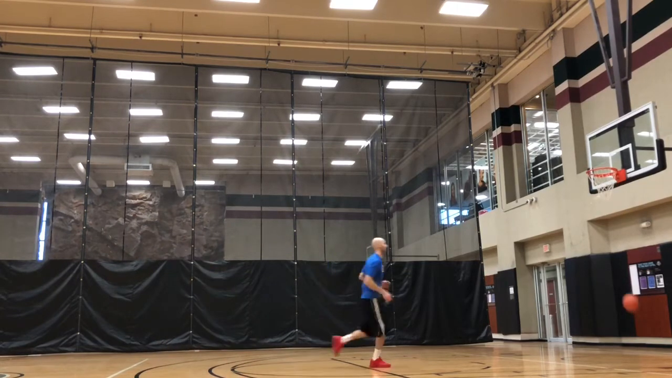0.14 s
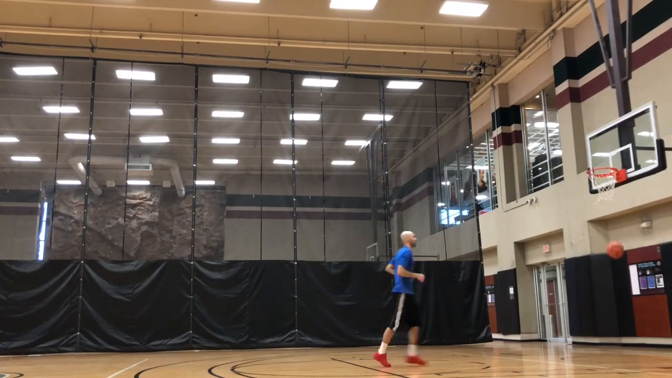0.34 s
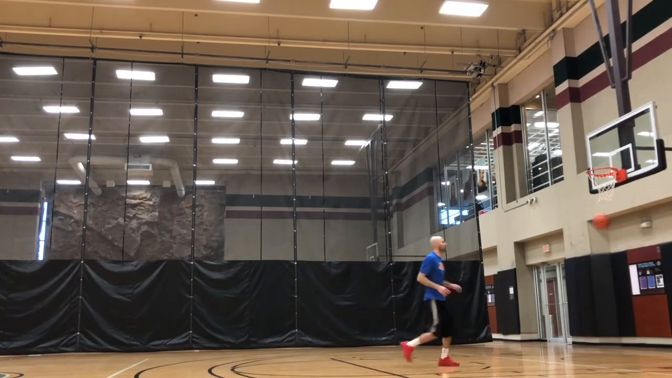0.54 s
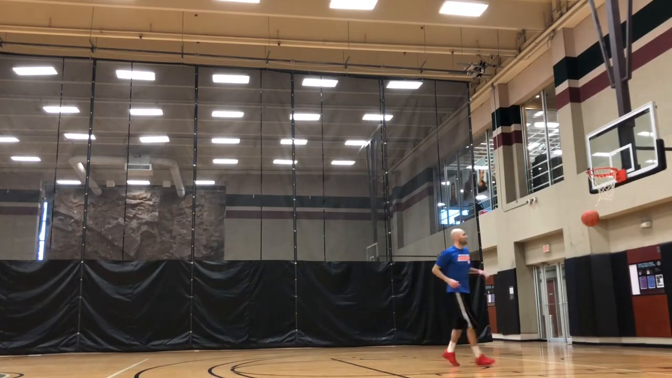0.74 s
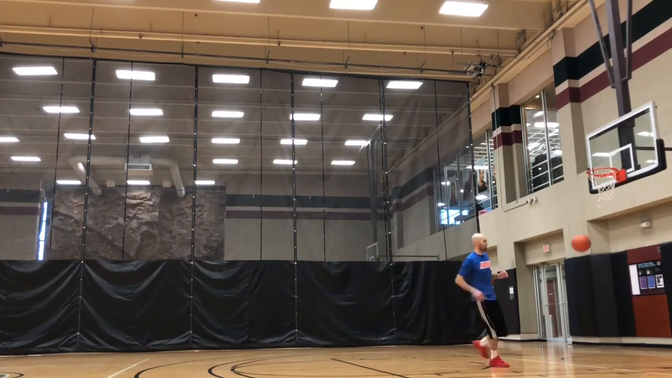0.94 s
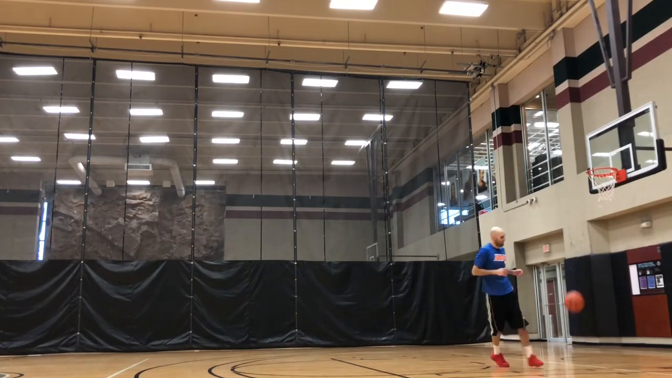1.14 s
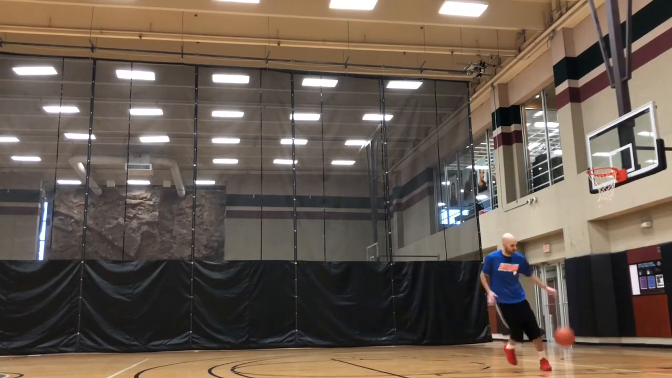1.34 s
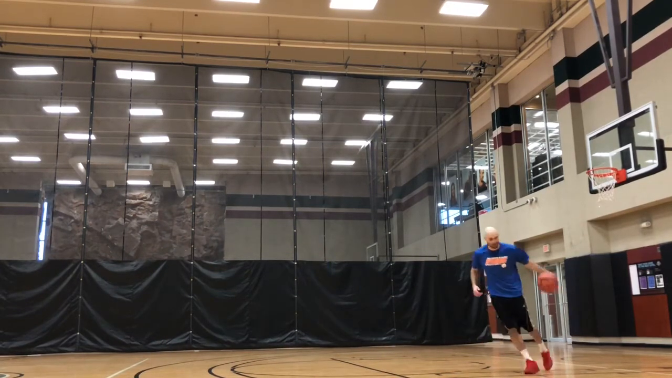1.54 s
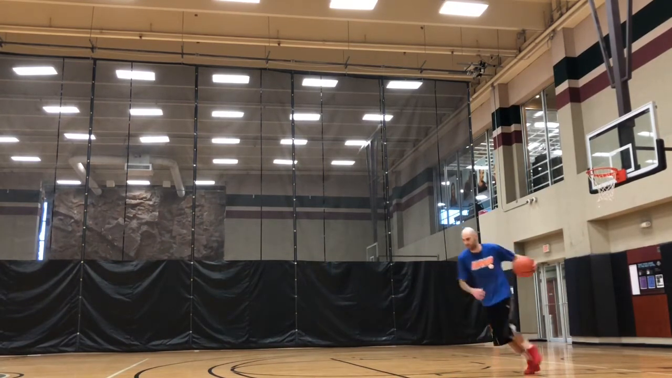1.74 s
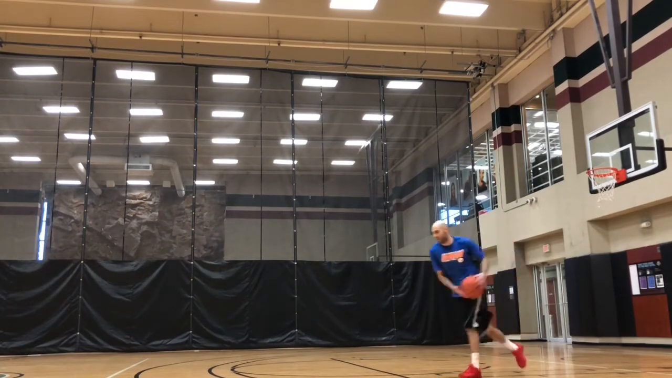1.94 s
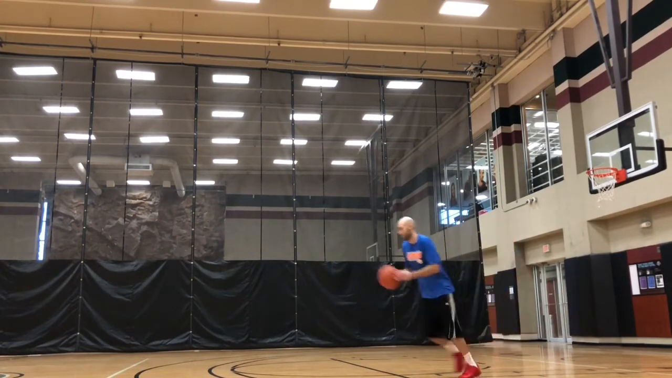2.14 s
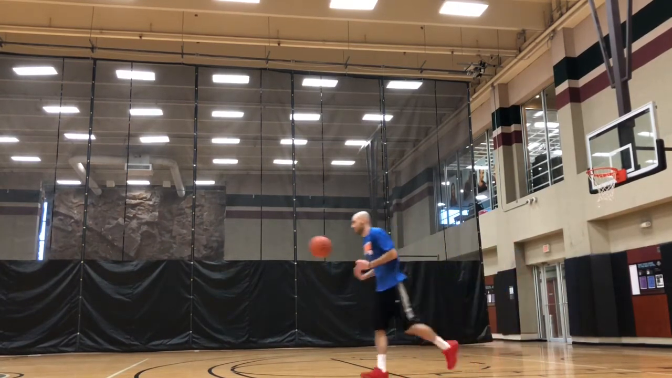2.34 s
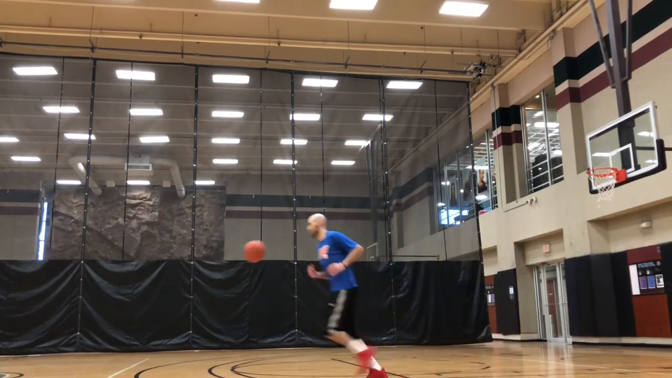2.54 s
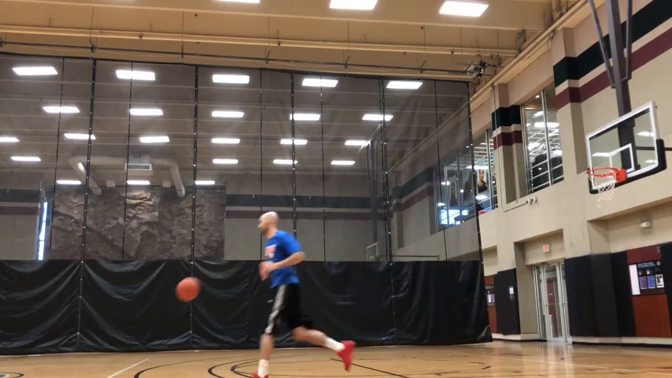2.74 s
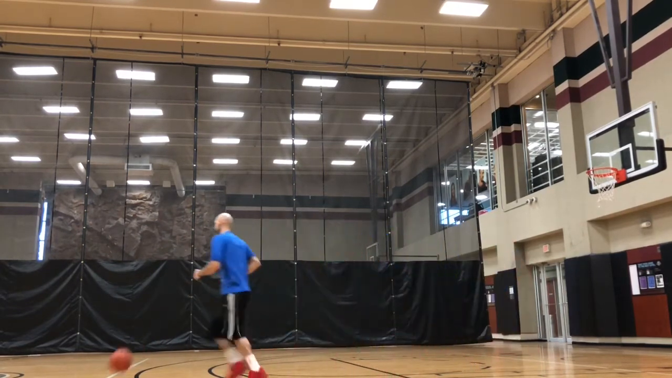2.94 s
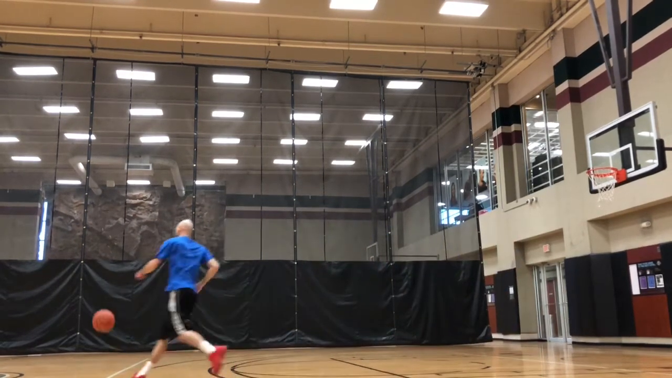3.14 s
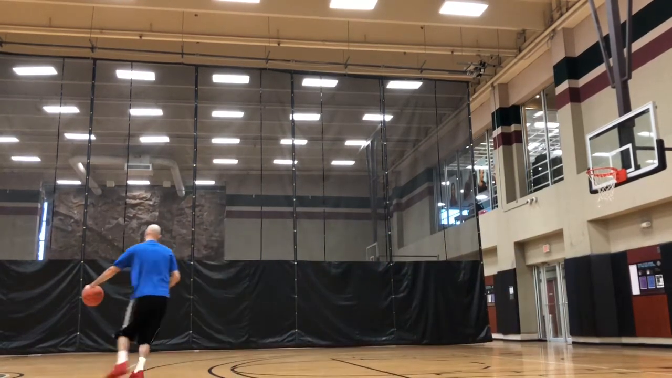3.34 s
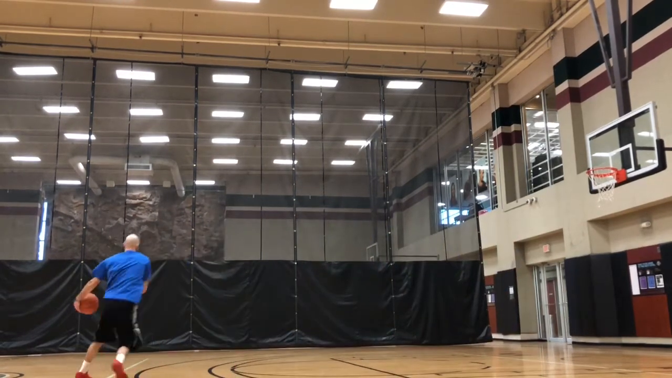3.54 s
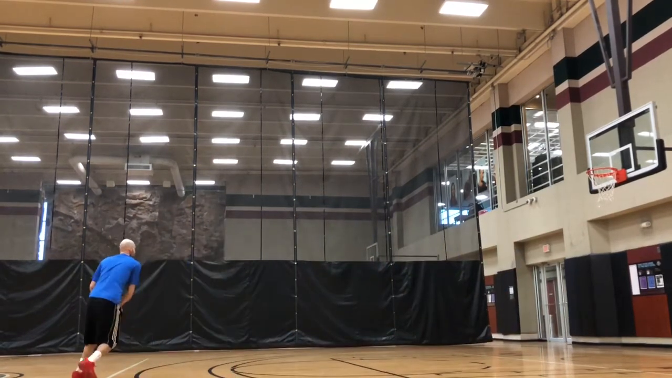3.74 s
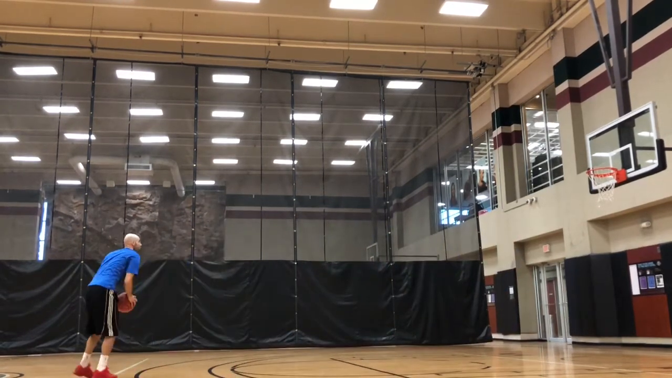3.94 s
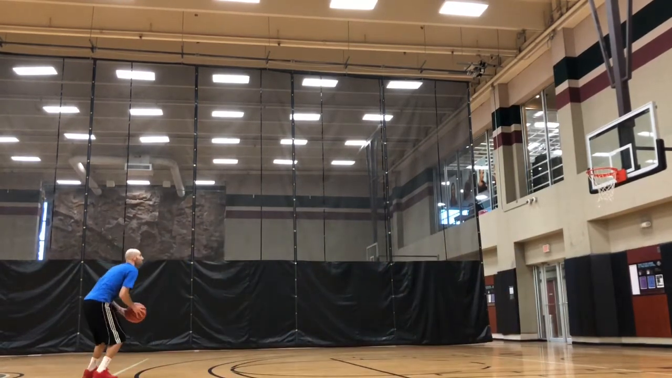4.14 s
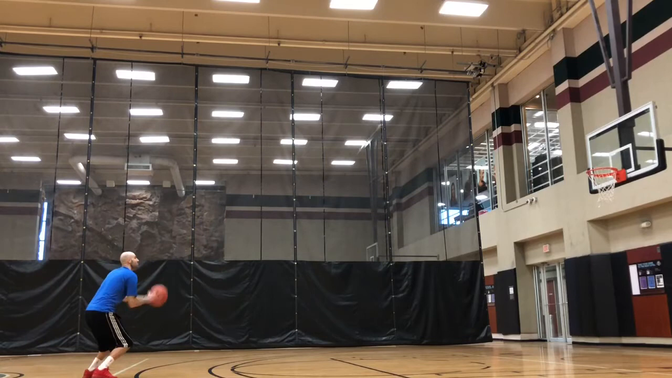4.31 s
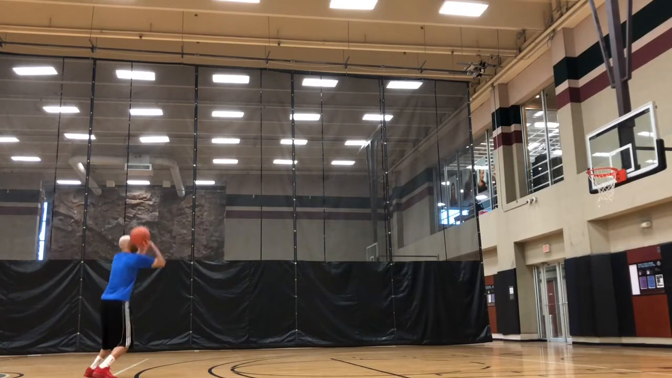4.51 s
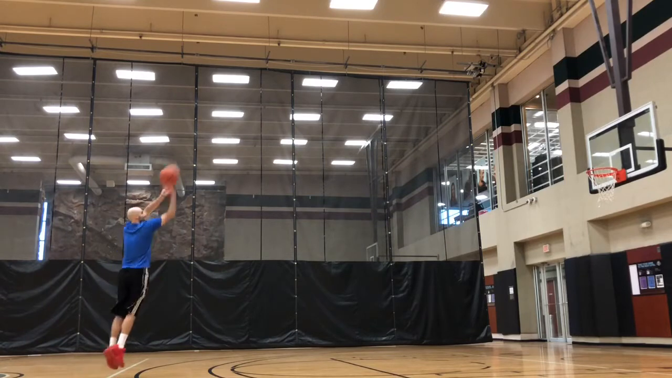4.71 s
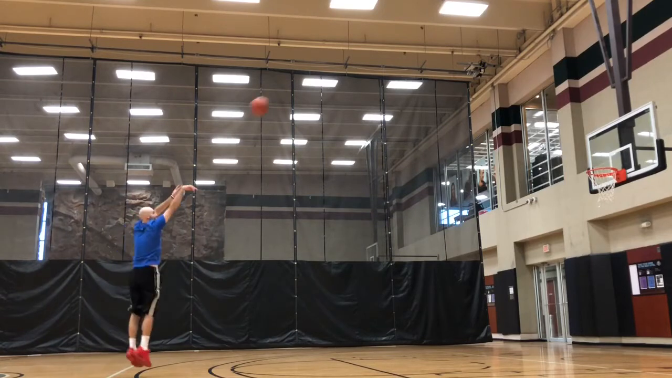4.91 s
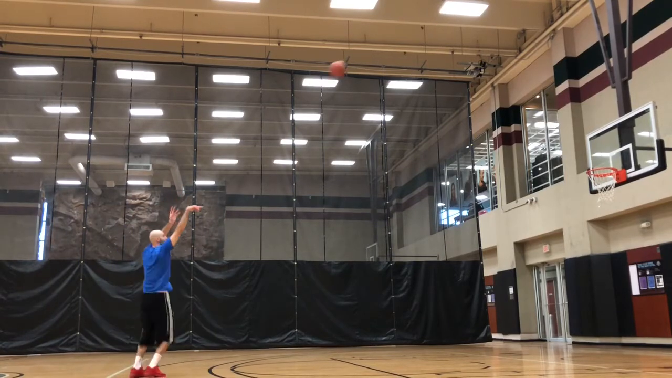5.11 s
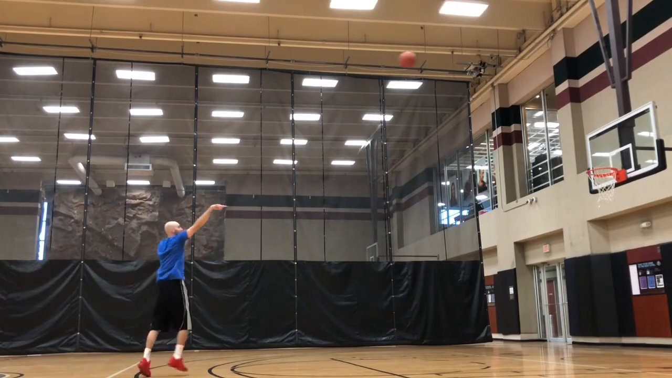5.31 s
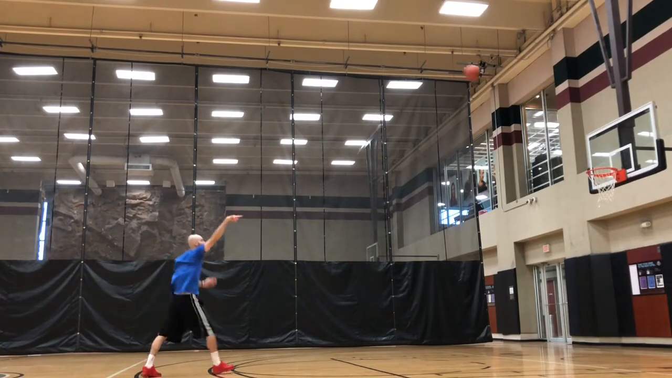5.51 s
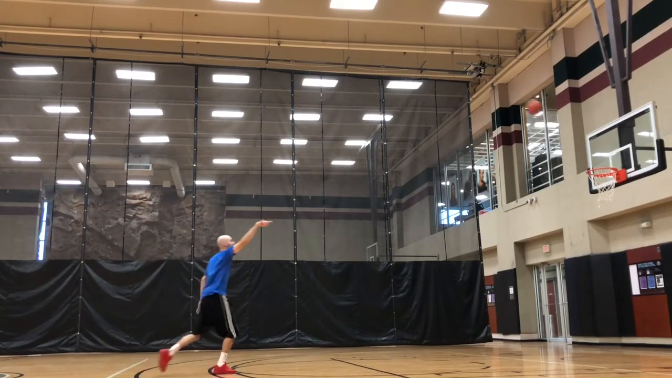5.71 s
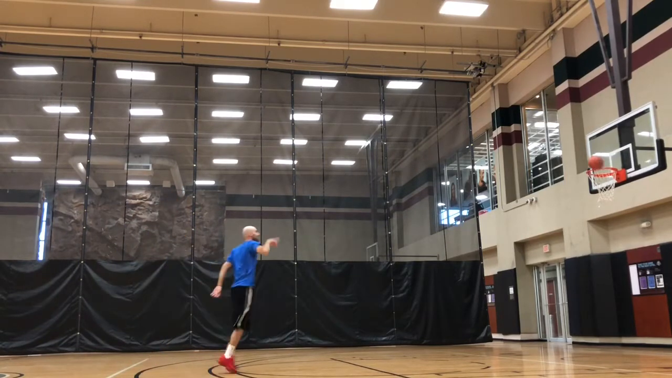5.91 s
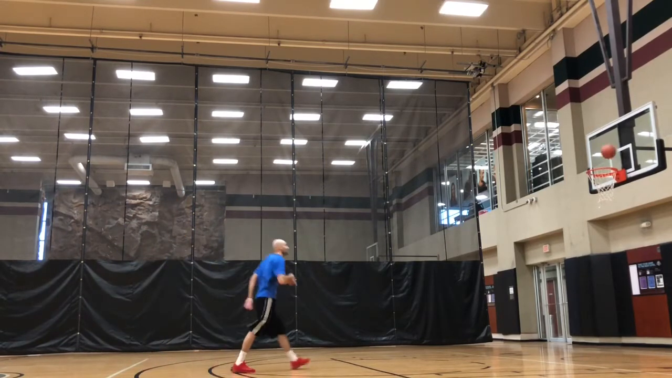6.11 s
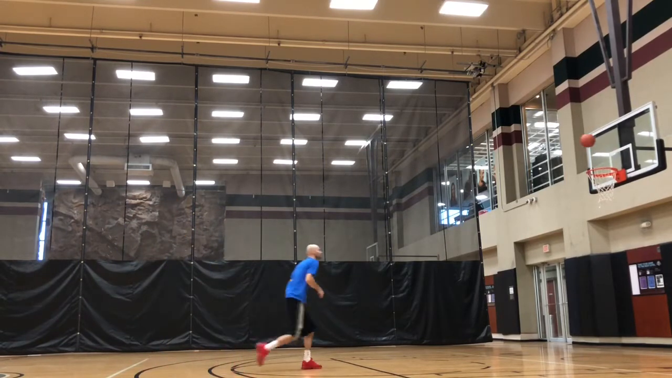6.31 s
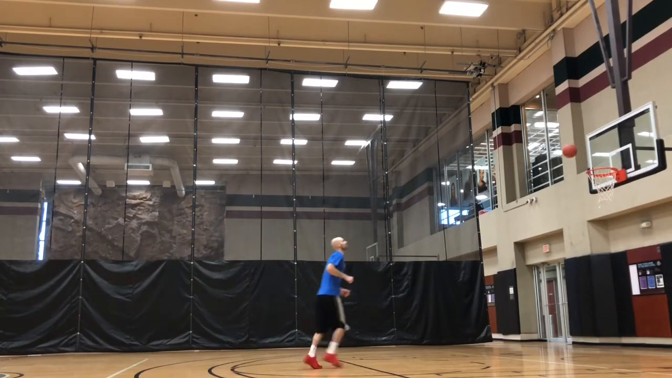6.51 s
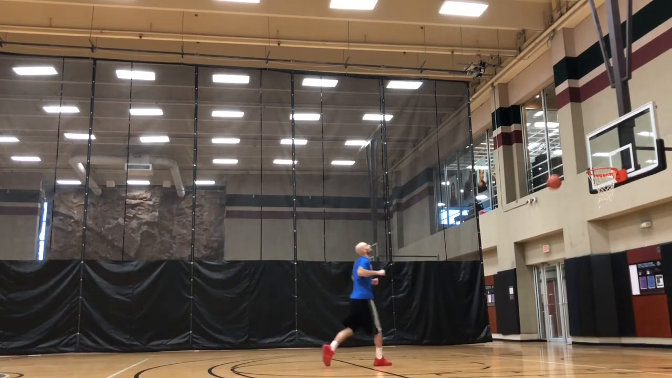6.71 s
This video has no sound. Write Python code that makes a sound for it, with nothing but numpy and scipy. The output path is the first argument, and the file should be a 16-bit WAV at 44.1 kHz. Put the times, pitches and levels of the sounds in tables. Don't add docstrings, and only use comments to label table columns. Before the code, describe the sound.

A basketball slaps and booms on a wooden gym floor three times, shoes tick and squeak, then a shot clatters the steel rim, everything echoing.

```python
import sys
import numpy as np
from scipy import signal
from scipy.io import wavfile
from scipy.ndimage import uniform_filter1d

SR = 44100
rng = np.random.default_rng(int(sys.argv[2]) if len(sys.argv) > 2 else 0)


def decibels_to_gain(level_db):
    exponent = np.asarray(level_db, float) / 20
    return 10 ** exponent


def to_wav(sig):
    pcm = np.clip(np.atleast_2d(sig), -1, 1) * 32767
    pcm = np.round(pcm).astype(np.int16)
    wavfile.write(sys.argv[1], SR, pcm.T)


N = 297932

# (frequency [Hz], density [dB per Hz])
AIR_SPECTRUM = [(15, -7.5), (25, -16), (80, 2), (127, -10.5), (202, -8.5), (388, -18), (522, -14),
                (567, -16), (615, -18), (1210, -24.5), (1970, -34), (5110, -45.5), (7270, -57.5),
                (15100, -62.5), (16400, -65)]
AIR_DB = -39.5
# (frequency [Hz], width [Hz], level [dB])
DRONE_TONES = [
    (60.2, 4.8, -43.5),
    (5070, 60, -85),
    (10869, 25, -84.5),
]

# (frequency [Hz], decay time t60 [s])
HALL_DECAY = [(60, 2.9), (160, 3.26), (420, 4.05), (1100, 4.92), (2900, 2.67), (5000, 1.24), (8000, 0.9),
              (14000, 0.07)]

# (time [s], level [dB], centre [Hz])
SHOE_TICKS = [(.926, -51, 4000), (2.036, -61, 5500), (2.051, -33.5, 2480), (2.066, -55, 5000),
              (2.458, -39, 2800), (2.459, -45, 90), (2.518, -56, 4000), (2.833, -35, 1400),
              (2.8398, -36.5, 3000), (2.884, -47, 4000), (3.034, -52, 4500), (3.633, -37, 2580),
              (3.771, -42, 3500), (3.823, -50, 4470), (3.843, -47, 5500), (4.051, -34.5, 2030),
              (4.053, -52, 6496), (4.064, -49, 7000), (4.065, -67, 13500), (4.290, -50.5, 14000),
              (4.835, -48.5, 7450), (5.101, -31, 2180), (5.1012, -51.5, 7000), (5.108, -36.5, 3600),
              (5.238, -45, 3600), (5.491, -40, 2500)]
TICK_S, TICK_SPREAD = 0.0046, 0.97
# (time [s], length [s], level [dB], centre [Hz])
SHOE_SCUFFS = [(.52, 0.067, -65.5, 12000), (0.92, 0.039, -76.5, 8000), (1.264, 0.086, -68, 9000),
               (1.61, 0.1, -61.5, 11090), (2.032, 0.038, -70, 10000), (2.403, 0.067, -68, 10000),
               (2.795, 0.054, -64, 10070), (2.83, .03, -55.5, 3000), (3.595, 0.13, -63, 6640),
               (3.787, 0.047, -67, 7900), (5.105, 0.025, -52, 3500), (5.5, 0.15, -56.5, 1800),
               (6.723, 0.055, -68, 13030)]
SQUEAK_S, SQUEAK_RISE_S, SQUEAK_LENGTH_S = 3.80, 0.13, 0.4
SQUEAK_DB, SQUEAK_FADE_DB_PER_S, SQUEAK_HZ, SQUEAK_SAG_HZ = -61, 73, 5270, 130

# (time [s], level [dB], centre [Hz], width [Hz])
RIM_KNOCKS = [(6.0172, -27.5, 6940, 13000), (6.029, -23.5, 3900, 5000), (6.039, -22, 3700, 2000),
              (6.043, -16, 1430, 119), (6.044, -12, 1050, 100), (6.048, -24, 6300, 900),
              (6.049, -22.5, 5250, 700), (6.0492, -22, 3700, 1010), (6.050, -25, 9900, 6000),
              (6.092, -29.5, 5470, 3000), (6.107, -23, 2870, 900), (6.075, -26, 5300, 1500),
              (6.138, -26.5, 6380, 500), (6.138, -36, 12100, 4000), (6.177, -47, 11000, 5000),
              (6.18, -33, 6940, 900), (6.428, -15, 850, 500), (6.7535, -39.5, 7000, 12000)]
KNOCK_S = 0.0097
# (frequency [Hz], level [dB], decay time t60
# [s])
HOOP_MODES = [(250, -0.5, .8), (332, -6.5, 0.5), (456, -5, 0.56), (620.5, 9.5, 1.2), (664, 4.5, 1.2),
              (671.8, 11.5, 1.2), (715, 4.5, 1.2), (725, -0.5, 0.84), (809, -3.5, 0.65), (1032, -19, 0.55),
              (1072, -14, .7), (1350, -10, 0.68), (1445, -23, .6), (6650, -21, .3)]
# (frequency [Hz], level [dB], decay time t60 [s])
BRACKET_MODES = [(2000, 9, 0.013), (2550, -11, 0.0089), (2790, 5, 0.013), (3340, 1, 0.012),
                 (3700, 7.5, 0.0056), (4300, -10, 0.0081), (4910, -2.5, 0.013), (5250, -0.5, 0.014),
                 (5750, -6, 0.013), (6300, -9, .01), (6720, -2, .02), (7450, -4.5, 0.014)]
# (frequency [Hz], density [dB per Hz])
BACKBOARD = [(24, -28), (40, 3), (137, -0.5), (209, 0.5), (237, -1), (269, 1.5), (444, 1.5), (516, 0),
             (650, 6), (1270, -6.5), (2440, -27), (2840, -26), (4460, -58), (6330, -43), (16000, -60)]
RIM_START_S, TOUCH_S, BLOW_S, HOLD_S = 6.0, 6.017, 6.09, 0.034
TOUCH_DB, BLOW_DB, SETTLE_DB_PER_S = -28.5, -13, 50

# (time [s], impact [dB], slap toward the microphone [dB], tick [dB], floor note [Hz])
BALL_BOUNCES = [
    (0.1161, -0.5, 2, -32, 101.5),
    (1.3787, -6, -1, 4.5, 93),
    (3.0704, -5.5, -14.5, -11, 91.5),
]
# (frequency [Hz], level [dB], decay time t60 [s])
BALL_MODES = [(224, 4, 0.057), (299, 9.5, 0.031), (479, 1, 0.083), (530, 1, 0.03), (833, -2, 0.062),
              (1159, 3.5, 0.038), (1400, 11.5, 0.014), (1740, -18, 0.042), (2720, -8, 0.033),
              (3690, -10, 0.029)]
# (frequency [Hz], density [dB per Hz])
SKIN_TO_HALL = [(24, -33), (680, -14.5), (880, -4.5), (1250, 1.5), (2000, -4), (3600, -8.5), (14500, -31.5),
                (16400, -73.5)]
# (frequency [Hz], density [dB per Hz])
BOOM_TO_HALL = [(24, -46), (40, -10), (92, 1.5), (200, -11), (330, -19.5), (480, -17.5), (700, -25.5),
                (2000, -50.5)]
# (time [s], level [dB], strongest frequency [Hz])
WALL_ECHOES = [(0.1312, -11.5, 4300), (0.149, -22, 6500), (0.157, -23.5, 3100), (0.1638, -21, 3780),
               (0.2026, -30, 3680), (0.2184, -42, 3070), (1.3885, -27, 4500), (1.4045, -17, 3700),
               (1.4155, -19.5, 3690), (1.431, -24, 1800), (1.438, -33, 6000), (1.473, -25, 2990),
               (1.483, -33, 1300), (3.0805, -28.5, 6000), (3.094, -45, 7000), (3.108, -30.5, 1250),
               (3.1125, -36, 6100), (3.130, -31, 8000), (3.176, -45, 12000), (3.2005, -40, 3200)]
CONTACT_S, CONTACT_PER_DB = 0.00078, 0.7
BOARDS_DB, BALL_DB, PEEL_DB, SKIN_HALL_DB, BOOM_HALL_DB = -8.5, -19.5, -17.5, -20, -10
SCATTER_S, WALL_TOP_HZ = 0.0018, 14000
DIFFUSE_S = 0.047


def evened(x):
    return x / np.sqrt(np.mean(x ** 2) + 1e-20)


def read(points, hz):
    f, value = np.transpose(points)
    return np.interp(np.log(hz + 1), np.log(f + 1), value)


def add(mix, s, sound):
    part = mix[round(s * SR):][:len(sound)]
    part += sound[:len(part)]


def coloured(x, spectrum):
    hz = abs(np.fft.fftfreq(8192, 1 / SR))
    log_gain = np.log(decibels_to_gain(np.maximum(read(spectrum, hz), -100)))
    taps = np.fft.ifft(np.exp(np.conj(signal.hilbert(log_gain)))).real[:4096]
    return signal.oaconvolve(x, taps / np.linalg.norm(taps))[:len(x)]


def resonate(x, hz, width):
    turn = np.exp(2j * np.pi * np.cumsum(hz * np.ones(len(x))) / SR)
    r = np.exp(-np.pi * width / SR)
    return 2 * (turn * signal.lfilter([1 - r], [1, -r], x / turn)).real


def band(x, low_hz, high_hz):
    return signal.sosfilt(signal.butter(2, [low_hz, high_hz], "bandpass", fs=SR, output="sos"), x)


def burst(length):
    return rng.standard_normal(1500) * np.exp(-np.arange(1500) / SR / length)


def lasting(length, hz):
    return length * np.sqrt(3000 / hz)


def knock(db, hz, width, length):
    puff = np.r_[3.5, burst(length)[1:]]
    sound = band(puff, max(hz - width / 2, hz / 4), min(hz + width / 2, 17000))
    return decibels_to_gain(db) * sound * np.hanning(3000)[1500:] / abs(sound).max()


def ring(modes, length):
    t = np.arange(round(length * SR)) / SR
    out = np.zeros(len(t))
    for k, (hz, db, t60) in enumerate(modes):
        out += (-1) ** k * decibels_to_gain(db - 60 * t / t60) * np.sin(2 * np.pi * hz * t)
    return out


def falling_wave(top_hz, low_hz, slow, rise, length):
    t = np.arange(13230) / SR
    phase = 2 * np.pi * (low_hz * t + top_hz * slow * np.log(1 + t / slow))
    return np.sin(phase) * (1 - np.exp(-t / rise)) * np.exp(-(t / length) ** 2)


def hall(build=0.11, early_db=6.0):
    taps = np.zeros(4 * SR)
    at = np.arange(0, len(taps), 12)
    uneven_db = early_db * np.exp(-at / SR / 0.45) * np.minimum(rng.exponential(1, len(at)), 4)
    tap_db = uneven_db - early_db * np.exp(-at / SR / 0.37)
    taps[at + rng.integers(0, 12, len(at))] = rng.choice([-1., 1.], len(at)) * decibels_to_gain(tap_db)
    hz, t, z = signal.stft(taps, SR, nperseg=512)
    decay = decibels_to_gain(-60 * t / read(HALL_DECAY, hz)[:, None])
    tail = signal.istft(z * decay, SR, nperseg=512)[1][:len(taps)]
    tail = tail * (1 - 0.26 * np.exp(-np.arange(len(tail)) / SR / build))
    return tail / np.linalg.norm(tail)


def ventilation():
    frames, hz = N // 512 + 5, np.fft.rfftfreq(2048, 1 / SR)
    a, b, patches = rng.standard_normal((frames, 1025, 3)).T
    patches = evened(uniform_filter1d(uniform_filter1d(patches, 20, 0), 10, 1))
    z = (a + 1j * b) * decibels_to_gain(read(AIR_SPECTRUM, hz)[:, None] + 0.44 * patches)
    out = decibels_to_gain(AIR_DB) * evened(signal.istft(z, nperseg=2048, noverlap=1536)[1][:N])
    for tone_hz, width, db in DRONE_TONES:
        out += decibels_to_gain(db) * evened(resonate(rng.standard_normal(N), tone_hz, width))
    return out


def squeak():
    t = np.arange(0, SQUEAK_LENGTH_S, 1 / SR)
    pitch = SQUEAK_HZ - SQUEAK_SAG_HZ * t / SQUEAK_LENGTH_S
    squeal = resonate(resonate(rng.standard_normal(len(t)), pitch, 500), pitch, 800)
    fade_db = SQUEAK_FADE_DB_PER_S * np.maximum(t - SQUEAK_RISE_S, 0)
    effort = np.minimum(t / SQUEAK_RISE_S, 1) * decibels_to_gain(SQUEAK_DB - fade_db)
    return effort * evened(squeal)


def shoes():
    out = np.zeros(N)
    for s, db, hz in SHOE_TICKS:
        add(out, s, knock(db, hz, TICK_SPREAD * hz, lasting(TICK_S, hz)))
    for s, length, db, hz in SHOE_SCUFFS:
        noise = rng.standard_normal(round(length * SR))
        brush = resonate(resonate(noise, hz, 1.4 * hz), hz, 1.4 * hz)
        add(out, s, decibels_to_gain(db) * evened(brush) * np.hanning(len(noise)))
    add(out, SQUEAK_S, squeak())
    return out + decibels_to_gain(-4.0) * signal.fftconvolve(out, hall())[:N]


def clattering_steel(t):
    build_db = np.interp(t, [TOUCH_S, BLOW_S], [TOUCH_DB, BLOW_DB], left=-120)
    shake = decibels_to_gain(build_db - SETTLE_DB_PER_S * np.maximum(t - BLOW_S - HOLD_S, 0))
    blows = decibels_to_gain(1.3 * np.minimum(rng.exponential(1, len(t)), 4)) * rng.choice([-1, 1], len(t))
    struck = rng.random(len(t)) < 3000 / SR
    part = rng.integers(0, len(BRACKET_MODES), len(t))
    clatter = shake * evened(blows * struck)
    hoop = ring([(hz, db, min(t60, 0.16)) for hz, db, t60 in HOOP_MODES], 0.5)
    out = decibels_to_gain(-0.5) * coloured(clatter, BACKBOARD)
    out += decibels_to_gain(-10) * signal.fftconvolve(clatter, hoop / np.linalg.norm(hoop))[:len(t)]
    for k, (hz, db, t60) in enumerate(BRACKET_MODES):
        ping = ring([(hz, db, min(t60, 0.012))], 0.03)
        out += decibels_to_gain(-21.5) * signal.fftconvolve(clatter * shake * (part == k), ping)[:len(t)]
    return out


def rim():
    t = RIM_START_S + np.arange(N - round(RIM_START_S * SR)) / SR
    steel = clattering_steel(t)
    for s, db, hz, width in RIM_KNOCKS:
        add(steel, s - RIM_START_S, knock(db, hz, width, lasting(KNOCK_S, hz)))
    out = np.zeros(N)
    add(out, RIM_START_S, decibels_to_gain(-1.5) * steel + decibels_to_gain(-7.5) * signal.fftconvolve(steel, hall())[:len(t)])
    return out


def skin_slap(impact_db, slap_db):
    across = np.r_[1, np.zeros(66), 0.3]
    click = np.r_[1, np.zeros(60)]
    length = CONTACT_S * decibels_to_gain(CONTACT_PER_DB * impact_db)
    slap = np.convolve(falling_wave(6400, 800, 0.0001, 0.00003, length)[:300], across)
    edge = 1.7 * band(click, 5960, 10500) + decibels_to_gain(-5 - 0.45 * slap_db) * band(click, 9700, 16300)
    return slap, np.convolve(edge, across)


def wall_slaps(out, slap, tick):
    source = slap + 2.4 * np.r_[tick, np.zeros(len(slap) - len(tick))]
    for s, db, hz in WALL_ECHOES:
        echo = np.convolve(source, burst(SCATTER_S))
        echo = 0.63 * echo + resonate(echo, hz, 1100) + 3 * resonate(echo, 1200, 350)
        echo = band(echo, 800, min(3 * hz, WALL_TOP_HZ))
        add(out, s, decibels_to_gain(db) * echo / abs(echo).max())


def earlier_sound(out):
    late = hall()[round(0.15 * SR):]
    fading = coloured(late, [(200, -5), (1000, -5.5), (2500, -29.5), (15000, -26.5)])
    add(out, 0, decibels_to_gain(-40) * fading / np.std(fading[:4410]))


def bounces():
    out = np.zeros(N)
    for s, impact_db, slap_db, tick_db, note_hz in BALL_BOUNCES:
        slap, tick = skin_slap(impact_db, slap_db)
        boards = falling_wave(620, note_hz, 0.00042, 0.009, 0.036)
        ball = ring(BALL_MODES, 0.1) * np.minimum(np.arange(4410) / 60, 1)
        path = 20 * hall()
        fill_s = DIFFUSE_S * decibels_to_gain(-0.55 * slap_db)
        filling = 1 - 0.64 * np.exp(-(np.arange(len(path)) / SR / fill_s) ** 2)
        skin_hall_db = SKIN_HALL_DB + 0.61 * impact_db + 0.35 * slap_db
        add(out, s, decibels_to_gain(slap_db) * slap)
        add(out, s - 0.0001, decibels_to_gain(tick_db) * tick)
        add(out, s, decibels_to_gain(PEEL_DB + 0.18 * slap_db) * band(burst(0.0017), 2300, 11000))
        add(out, s + 0.0033, decibels_to_gain(BOARDS_DB + impact_db) * boards)
        add(out, s + 0.00162, decibels_to_gain(BALL_DB + 0.85 * impact_db) * ball)
        add(out, s + 0.002065, decibels_to_gain(skin_hall_db) * filling * coloured(path, SKIN_TO_HALL))
        add(out, s + 0.0041, decibels_to_gain(BOOM_HALL_DB + 0.83 * impact_db) * coloured(path, BOOM_TO_HALL))
    wall_slaps(out, slap, tick)
    earlier_sound(out)
    return out


def scene():
    return (ventilation() + shoes() + rim() + bounces())[None]


def roll_off(x):
    return signal.sosfilt(signal.butter(12, 16750, fs=SR, output="sos"), x)


def record(dry):
    heard = signal.sosfilt(signal.butter(2, 42, "highpass", fs=SR, output="sos"), dry)
    return roll_off(np.clip(heard, -1, 1))


dry = scene()
out = record(dry)
to_wav(out)
```